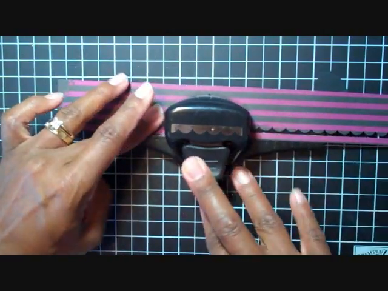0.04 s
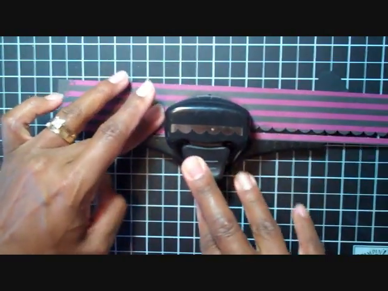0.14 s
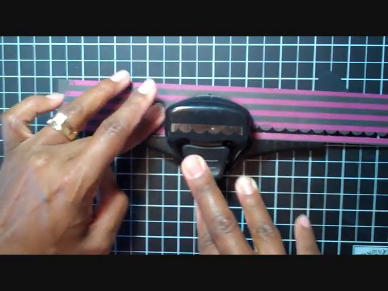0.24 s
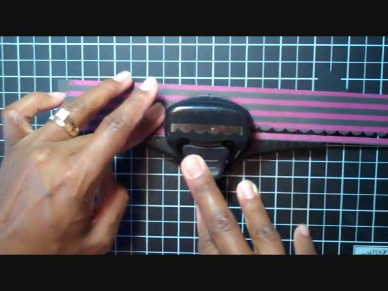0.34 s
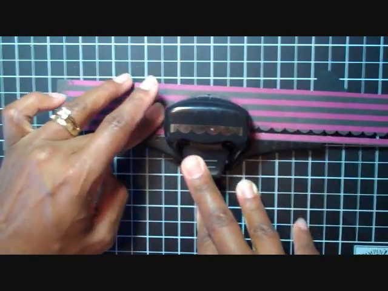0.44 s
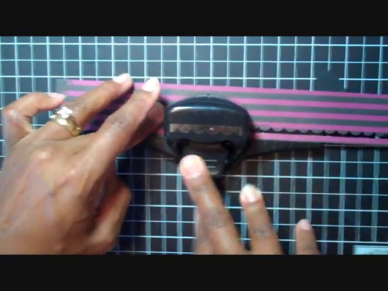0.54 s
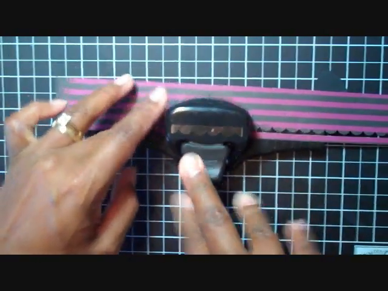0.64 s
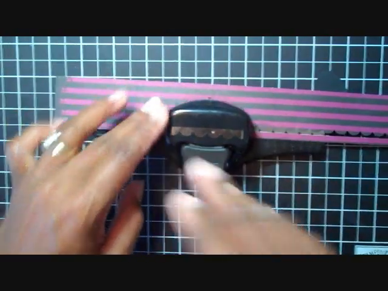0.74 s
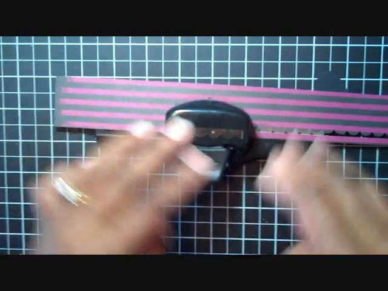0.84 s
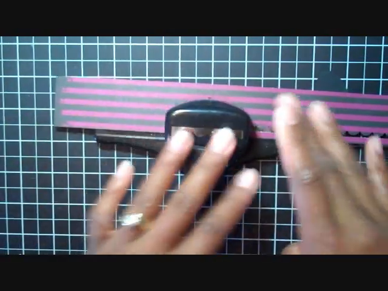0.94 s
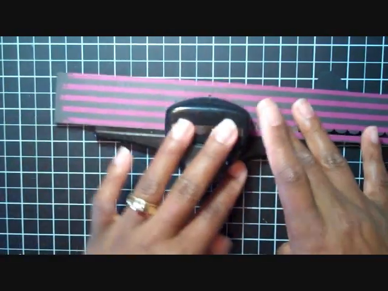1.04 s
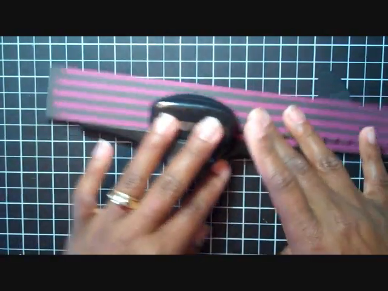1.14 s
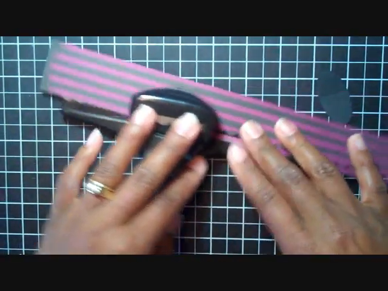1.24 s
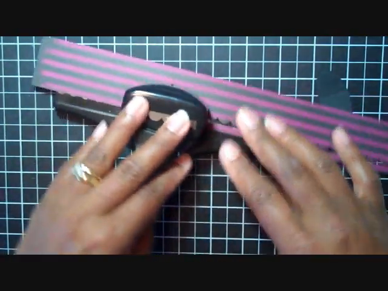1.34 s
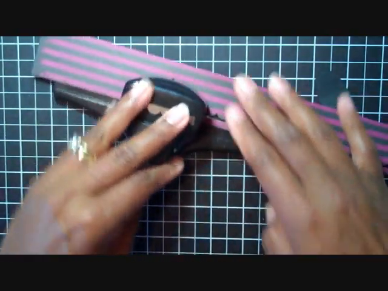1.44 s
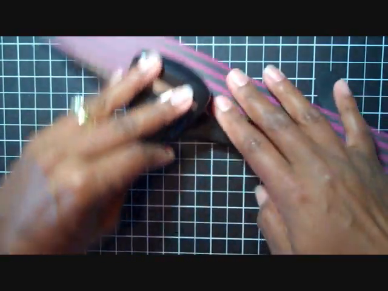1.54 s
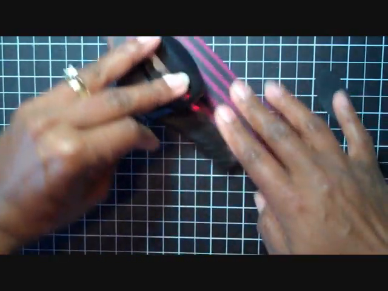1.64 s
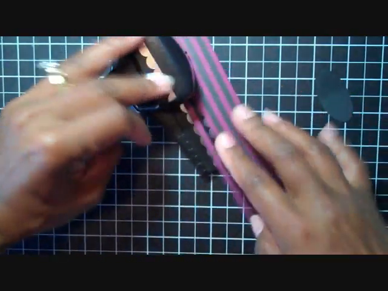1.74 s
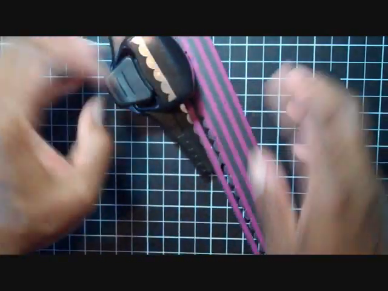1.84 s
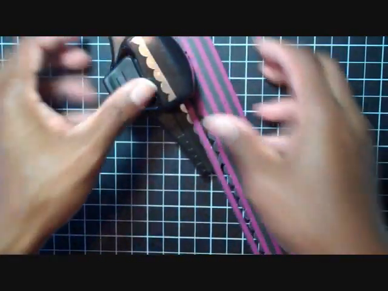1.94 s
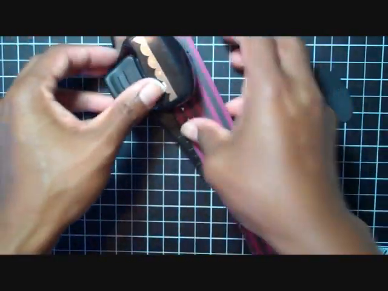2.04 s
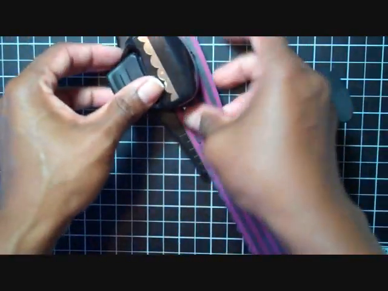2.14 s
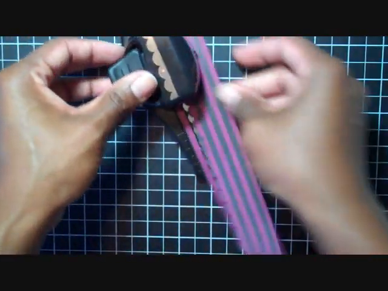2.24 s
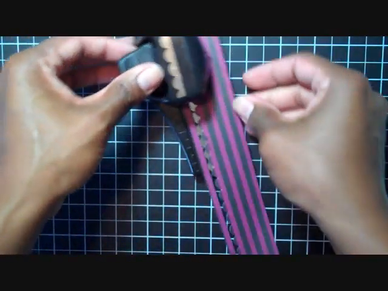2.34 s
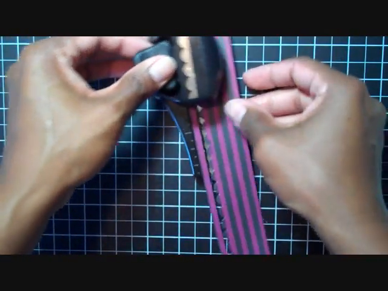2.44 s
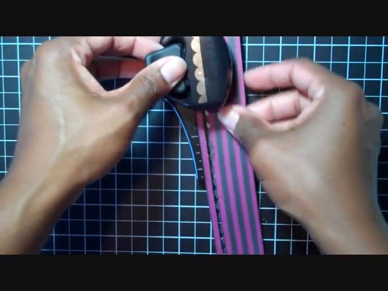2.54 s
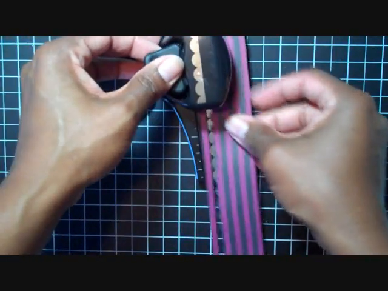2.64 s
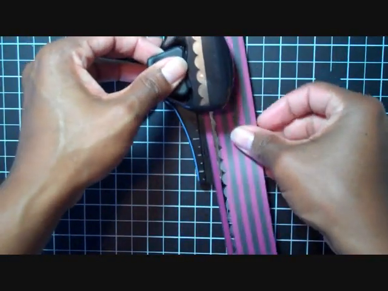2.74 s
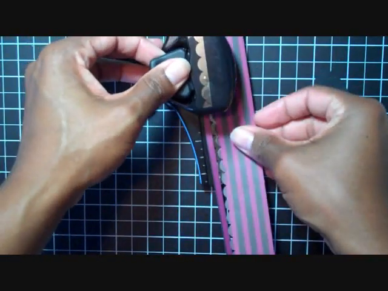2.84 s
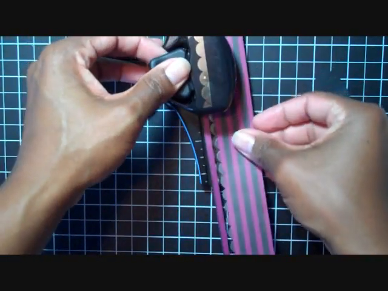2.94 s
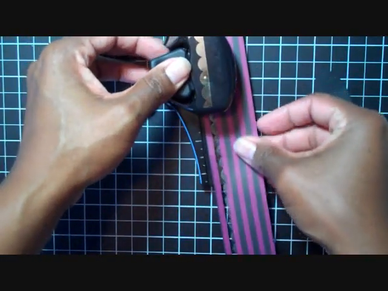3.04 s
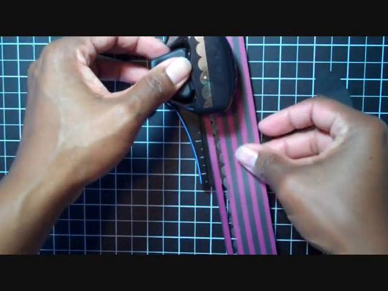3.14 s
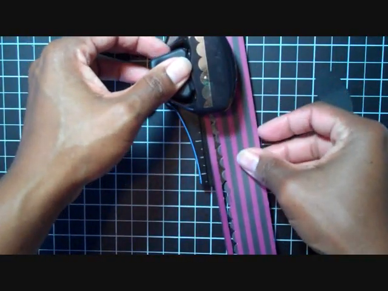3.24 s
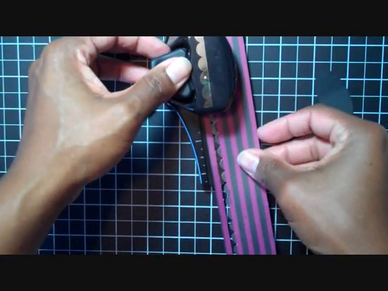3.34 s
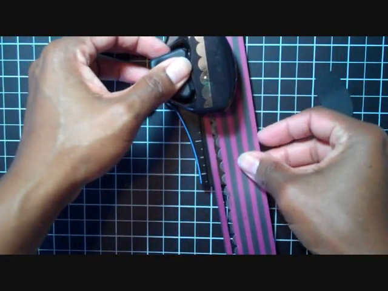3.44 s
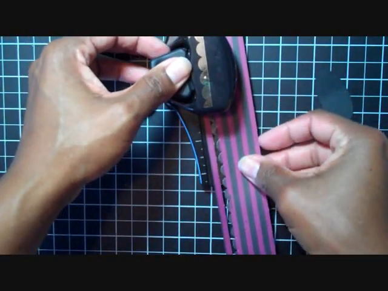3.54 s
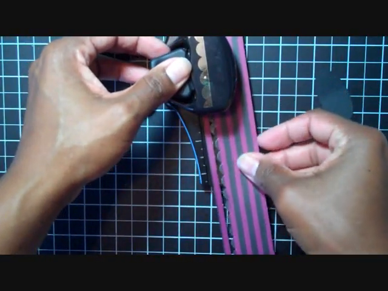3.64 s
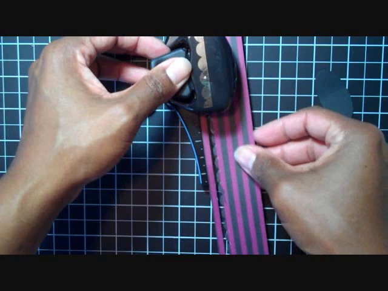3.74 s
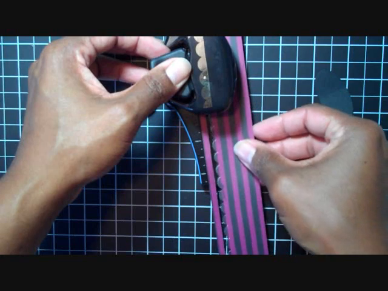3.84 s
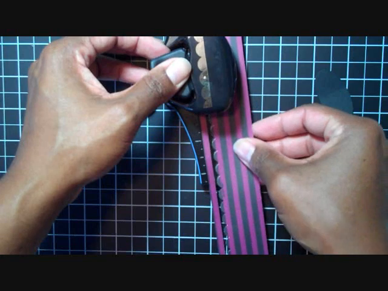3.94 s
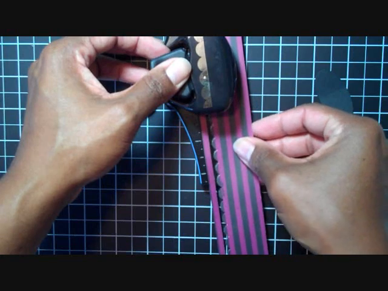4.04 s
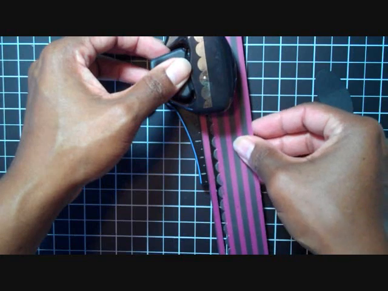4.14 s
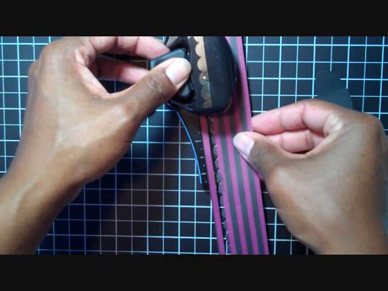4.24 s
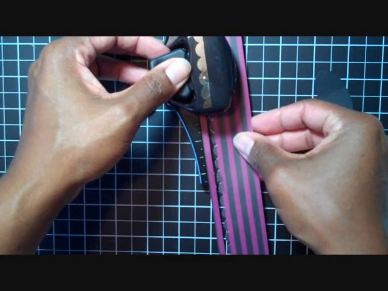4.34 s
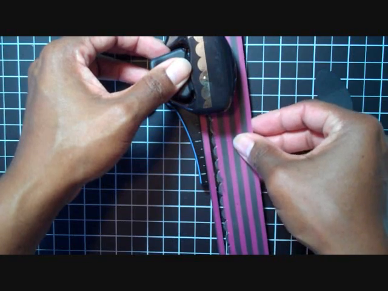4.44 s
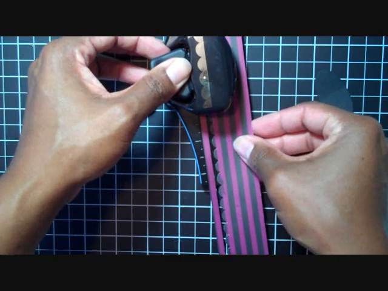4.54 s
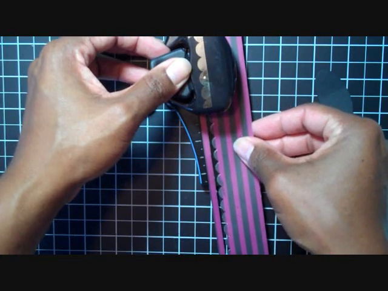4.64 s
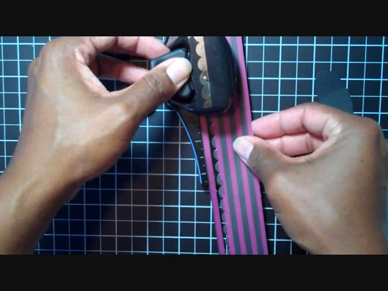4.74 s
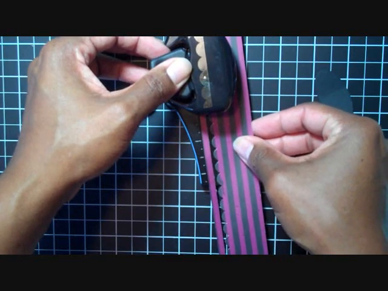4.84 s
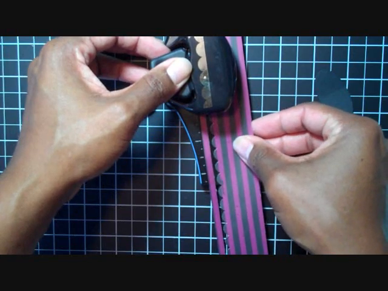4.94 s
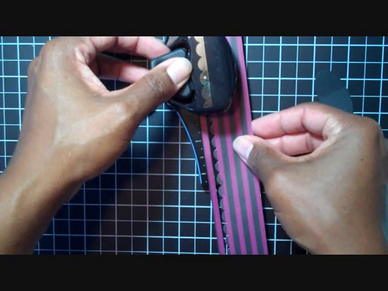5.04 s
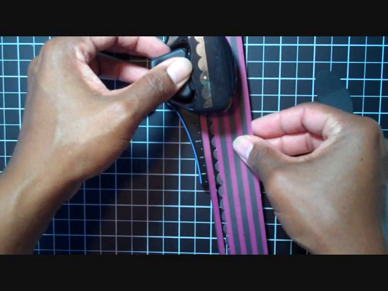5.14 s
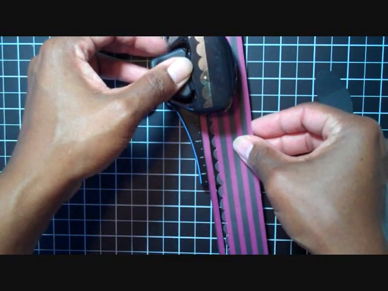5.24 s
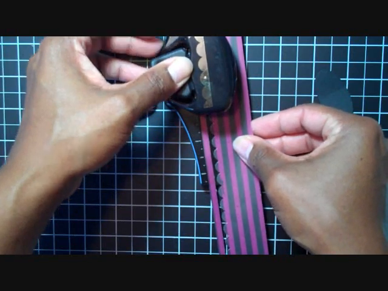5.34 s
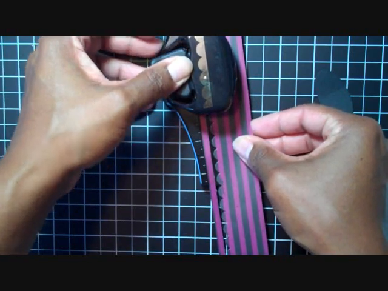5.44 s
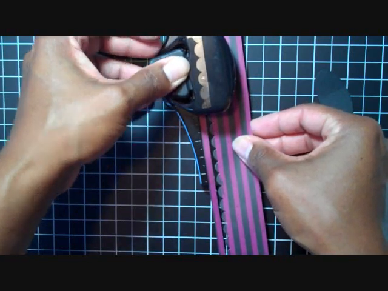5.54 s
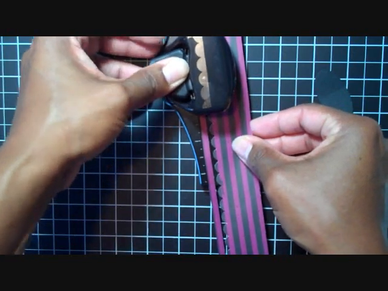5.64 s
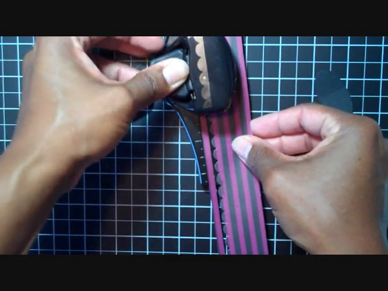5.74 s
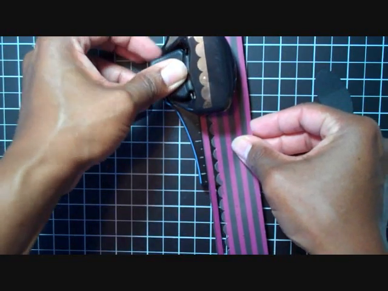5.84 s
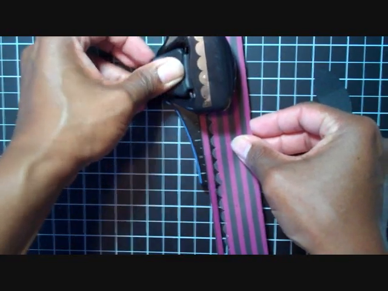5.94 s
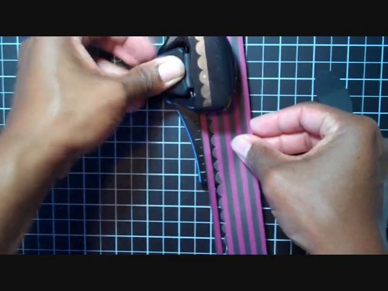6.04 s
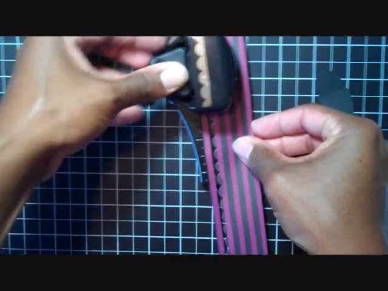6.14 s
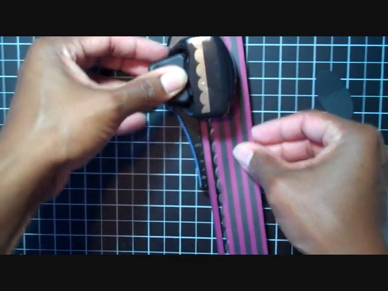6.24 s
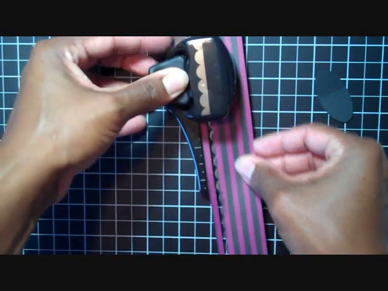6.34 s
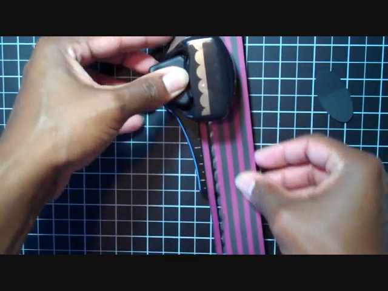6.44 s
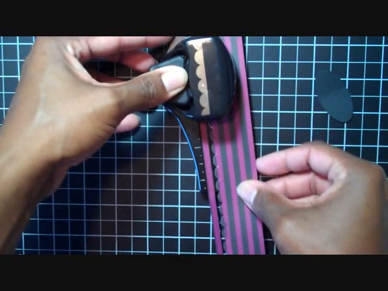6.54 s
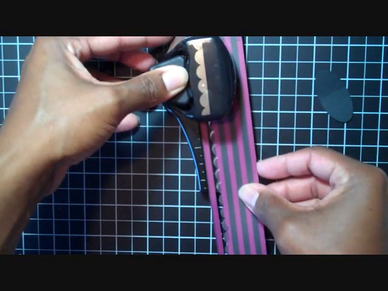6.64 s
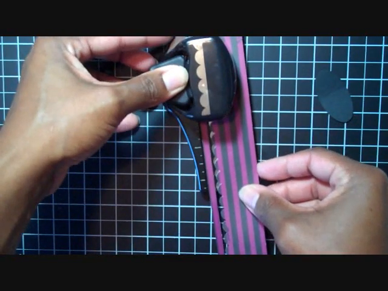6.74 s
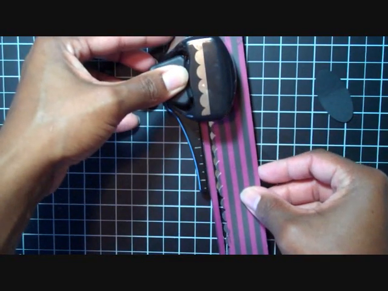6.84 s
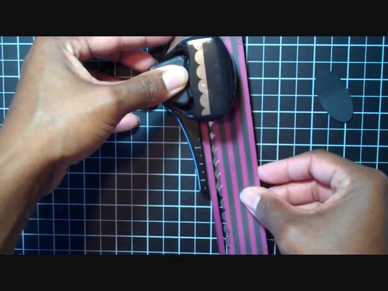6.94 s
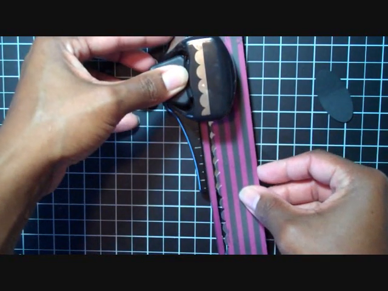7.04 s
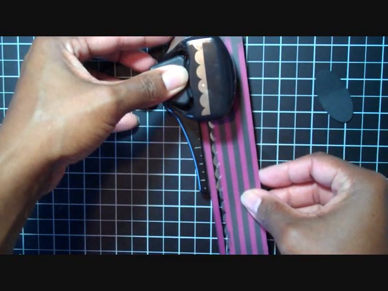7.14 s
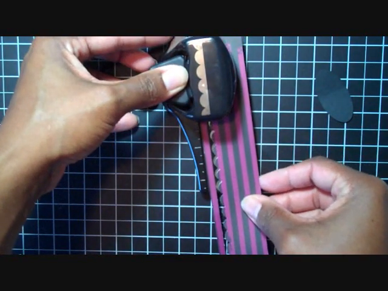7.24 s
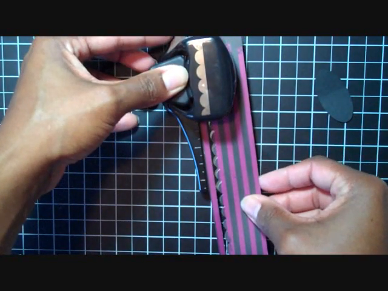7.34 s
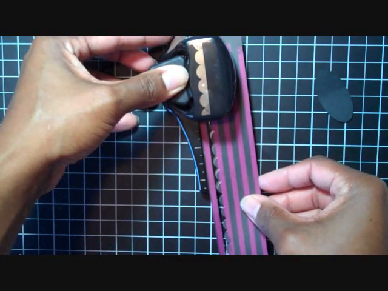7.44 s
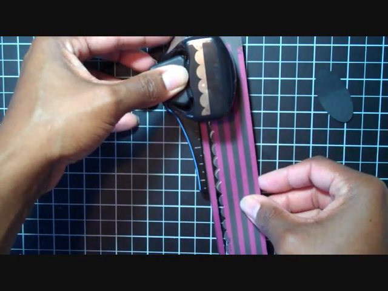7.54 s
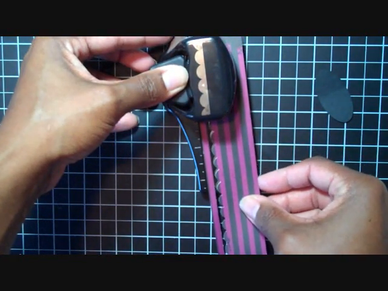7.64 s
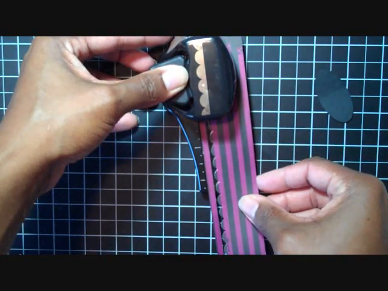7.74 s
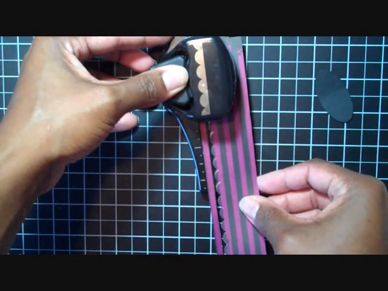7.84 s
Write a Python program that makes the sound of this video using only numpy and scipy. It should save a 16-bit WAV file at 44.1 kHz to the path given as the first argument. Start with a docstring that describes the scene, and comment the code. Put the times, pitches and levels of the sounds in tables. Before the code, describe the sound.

Close on a craft table in a small room, a plastic paper punch clicks and snaps hard at the start. Paper and punch then slide and rattle busily over the mat for a couple of seconds, thin out to faint rustles, and a second firm double-stage snap comes near six seconds, followed by ticks and light rubbing. A faint fan hums behind; close stereo pickup, slightly dull.

```python
"""A fan hums far off in a small room, where an earlier snap still dies away as we begin. At the table a plastic
border punch clicks at lever, hinge and paper, from bursts of tiny contacts; its die bites through a paper strip
at about 0.5 and 6 s, each bite a dense run of cracks, and at 2.1 s the paper crumples in a sparser crackle.
Between bites punch and paper slide over the cutting mat as filtered grains, and soft bumps shake the table. Two
resonant microphone ports colour left and right."""
import sys
import numpy as np
from scipy import signal
from scipy.io import wavfile

SR = 44100
rng = np.random.default_rng(int(sys.argv[2]) if len(sys.argv) > 2 else 0)


def waveform_to_disk(signal):
    """Save audio, clipped to [-1, 1], as 16-bit WAV at the path in sys.argv[1]."""
    frames = np.transpose(np.atleast_2d(signal))
    scaled = np.clip(frames, -1, 1) * 32767
    samples = np.round(scaled).astype(np.int16)
    wavfile.write(sys.argv[1], SR, samples)


N = 347508
T = np.arange(N) / SR   # seconds

# Room air, relative spectrum. Each row: frequency in Hz, density in dB per Hz.
AIR_SPECTRUM = [(18, -58), (30, -8), (217, -5.5), (256, -14.5), (423, -3), (591, -18), (865, -10.5),
                (1240, -17.5), (1530, -17.5), (1950, -19.5), (2140, -19), (4380, -27), (8950, -60),
                (11600, -74), (19700, -120)]
# Likeness of left and right microphone in the room sound. Each row: frequency in Hz, correlation from 0 to 1.
LIKENESS = [(60, 0.44), (210, 0.91), (710, 0.84), (2460, 0.3), (8500, 0.01)]
# Distant fan, humming in the ducts. Each row: frequency in Hz, width in Hz, level in dB.
FAN_HUMS = [(417, 20, -61), (880, 80, -70), (1550, 130, -70)]
# Small room's reverberation. Each row: frequency in Hz, time to fall 60 dB in s, relative level in dB.
ROOM_DECAY = [(200, 0.15, -18), (600, 0.27, -25.5), (1610, 0.13, -22), (3670, 0.37, -31),
              (7000, 0.14, -25.5), (12000, 0.11, -20)]
# Clicks of lever, hinge and paper. Each row: start in seconds, peaks of crack, housing ring and slap in dB,
# slap pitch in Hz, contact time in ms.
CLICKS = [(0.1128, -40, -33.5, -29, 2520, 8.2), (0.1272, 3.5, -13.5, -5.5, 2730, 1.93),
          (0.3054, -10, -20.5, -12.5, 4300, 4.1), (0.452, -34, -61.5, -41, 2330, 13),
          (0.7, -40, -25.5, -28.5, 1880, 3.9), (0.714, -13, -39.5, -28.5, 4250, 2.2),
          (0.7537, -6, -15, -3.5, 1790, 2.73), (0.764, -27, -25, -33.5, 1890, 2.9),
          (0.7821, -28, -31.5, -19.5, 1660, 1.4), (0.7876, -4, -13.5, -7.5, 1690, 3),
          (1.168, -13.5, -42, -27.5, 3930, 4.2), (1.2089, -25, -34.5, -9.5, 3670, 3.6),
          (1.4206, -29, -58, -39, 3950, 7.8), (1.635, -18, -46, -13, 3850, 6.3),
          (1.6666, -42, -58, -20.5, 1910, 9.5), (1.8386, -22, -22.5, -7.5, 1820, 5.7),
          (1.8557, -21.5, -21, -11, 1860, 1.61), (2.045, -41, -31.5, -33, 1510, 7.8),
          (2.2546, -39, -29.5, -24, 2590, 4.7), (2.2658, -10.5, -47, -17, 4200, 3.6),
          (2.3166, -10, -51.5, -7.5, 3940, 3.5), (2.343, -22, -53, -30.5, 1980, 3.1),
          (2.4225, -20, -52, -26, 2960, 6.9), (2.4408, -9.5, -58, -18, 4300, 4.3),
          (2.5226, -18, -47, -18, 2540, 5.1), (2.63, -26, -50, -25, 4220, 6.9),
          (2.773, -27, -68, -31, 1700, 6.7), (2.8207, -42, -65, -28, 1950, 4.2),
          (2.9833, -40, -65, -38, 3990, 12.5), (3.8176, -37, -63, -45, 3710, 6.2),
          (4.2954, -58, -44, -24.5, 1880, 0.66), (4.3587, -62, -44, -37, 1870, 4.7),
          (4.404, -60, -55, -43, 3670, 4.5), (4.447, -71, -58, -34.5, 3790, 3.5),
          (5.6733, -46, -44.5, -48, 1540, 1.9), (5.7795, -49.5, -34, -36.5, 1550, 2.5),
          (5.7888, -33, -49.5, -30.5, 1910, 10.5), (5.8217, -29, -49, -43.5, 4100, 2.9),
          (5.8346, -13.5, -16.5, -11.5, 1860, 2), (5.8952, -24.5, -39, -29, 1770, 3.4),
          (5.9105, -16.5, -26, -21.5, 1850, 7.8), (5.9352, -3, -18, -15, 1670, 3.96),
          (5.961, -17, -37, -29.5, 4300, 16), (5.9788, -15.5, -28.5, -29, 4300, 4.7),
          (6.1567, -37.5, -24.5, -28, 1650, 0.83), (6.17, -20, -32.5, -21, 4300, 3.7),
          (6.193, -23.5, -31, -32, 1580, 3.9), (6.247, -11, -29, -25, 1640, 10),
          (6.256, -11.5, -43, -4.5, 4300, 2.1), (6.3128, -8.5, -42, -14.5, 2630, 2.73),
          (6.4052, -30, -49, -37.5, 1560, 6.2), (7.1002, -41, -61, -44, 4040, 5),
          (7.358, -24.5, -49, -18, 3370, 2.4)]
# Table top resonances. Each row: frequency in Hz, width in Hz, relative level in dB.
TABLE_MODES = [(132.8, 230, -9), (238, 17, 5), (298, 54, 7.5), (417, 260, 0.5)]
# Plastic punch housing. Each row: frequency in Hz, relative level in dB, time to fall 60 dB in s.
HOUSING_MODES = [(653, -11, 0.017), (944, -5.5, 0.044), (1080, -4.5, 0.027), (1166, 0.5, 0.01),
                 (1420, 0, 0.0093)]
# Strokes of paper and punch over the mat. Each row: start in seconds, length in seconds,
# paper hiss at first and at last in dB, housing scrape in dB.
STROKES = [(0.305, 0.0027, -39, -42, -41.5), (0.72, 0.039, -44, -39, -42), (1.117, 0.042, -55.5, -56, -57),
           (1.203, .24, -40.5, -41.5, -48), (1.496, 0.03, -41, -49, -46.5), (1.589, 0.076, -36, -37, -39),
           (1.694, 0.13, -35, -27.5, -44.5), (1.86, 0.023, -51, -39, -40.5), (2.001, .01, -60, -54, -56.5),
           (2.07, 0.11, -54, -41, -50.5), (2.224, 0.203, -44.5, -41.5, -48),
           (2.455, 0.2, -39.5, -44.5, -47.5), (2.702, 0.019, -49.5, -48, -55.5),
           (2.754, 0.078, -40.5, -50.5, -56), (2.854, 0.059, -60, -49.5, -52.5),
           (2.985, 0.044, -56, -52.5, -56.5), (3.05, 0.087, -60, -57, -58), (3.122, 0.12, -49, -59, -61.5),
           (3.235, .12, -63, -61, -72.5), (3.542, .12, -56.5, -66, -80.5), (3.735, 0.21, -57.5, -60.5, -72),
           (4.27, 0.15, -57.5, -75.5, -70), (4.451, 0.24, -83, -65, -82), (5.855, 0.13, -41, -47, -42),
           (6.174, 0.083, -41, -48.5, -50.5), (6.33, 0.12, -55.5, -45.5, -58),
           (6.48, 0.26, -44, -63.5, -59.5), (6.876, 0.086, -57.5, -64.5, -65),
           (7.223, 0.093, -55, -56, -64)]
# Plastic feet scraping on the mat. Each row: frequency in Hz, width in Hz, relative level in dB.
SCRAPE_MODES = [(265.4, 170, -8.5), (950, 130, 1), (1510, 430, -0.5), (1900, 240, 3), (2630, 440, -4.5)]
# The die going through the sheet, and at 2.1 s the paper crumpling. Each row: start in seconds, length in
# seconds, cracks per second, # first and last level in dB, slap pitch in Hz, then thud, housing and slap
# against the crack in dB.
CRUNCHES = [(0.464, 0.017, 16000, -20, -22, 1870, -25.5, -6.5, -3.5),
            (0.4737, 0.013, 10100, -9.5, 2.5, 1820, -22.5, -9, 0),
            (2.109, 0.046, 1900, -16, -15.5, 3800, -27, -25, -7.5),
            (5.841, 0.012, 13000, -21, -27, 1920, -6, -7, 0.5),
            (6.0076, 0.013, 13200, -13, 0.5, 1870, -18.5, -9, -2)]
# The tilted punch bumping the table softly. Each row: start in seconds, peak in dB.
BUMPS = [(2.141, -40), (2.265, -40.5), (2.463, -44), (2.632, -39.5), (5.846, -29), (6.012, -21),
         (6.159, -37)]
# Microphone inlets, left then right. Each row: resonance in Hz, width in Hz, shading above this Hz.
PORTS = [(7234, 1200, 5000), (6220, 690, 2800)]

AIR_DB = -54.5
ECHO_DB, ROOM_GAP_S = -14.5, 0.0064   # the echo fades in around this gap
EARLIER_SNAP_S, EARLIER_SNAP_DB = 0.04, 15.5   # the snap came this long before the start
PORT_LIFT_DB = -0.5   # what the inlets add to a crack, taken off beforehand
THUD_UNDER_HOUSING_DB = 13.5   # what shakes the housing also thuds into the table
RISE_DB_PER_S, FALL_DB_PER_S = 699.5, 501.5   # a stroke gathers and loses speed
AIRY_DB, AIRY_PER_DB = -6, -0.16   # top of the paper hiss at -42.5 dB; louder strokes have relatively less
CRACKLES_PER_S, CRACKLE_DB = 140, -8.5   # creases snap while the paper moves
CRUNCH_END_DB_PER_S = 5000
BUMP_MS = 1.75   # time to the peak of the push
HISS_DB, BASS_CUT_HZ, CUTOFF_HZ = -62.5, 96, 14650


def amp(db):
    """dB to gain."""
    return 10 ** (np.asarray(db) / 20)


def rms_one(x):
    """Scales to unit rms."""
    return x / np.sqrt(np.mean(x ** 2) + 1e-20)


def at_hz(points, hz, column=1):
    """Reads a table on a log-frequency axis."""
    points = np.array(points)
    return np.interp(np.log(hz), np.log(points[:, 0]), points[:, column])


def band(x, low_hz, high_hz):
    """Band-pass."""
    sos = signal.butter(2, [low_hz, high_hz], "band", fs=SR, output="sos")
    return signal.sosfilt(sos, x + 1e-18)


def two_poles(hz, width):
    """Feedback of one resonance; the width sets how fast it dies."""
    r = np.exp(-np.pi * width / SR)
    return [1, -2 * r * np.cos(2 * np.pi * hz / SR), r * r]


def resonate(x, peaks):
    """Parallel resonances of (Hz, width, dB), signs alternating."""
    out = 0
    for k, (hz, width, db) in enumerate(peaks):
        a = two_poles(hz, width)
        b = [(1 - a[2]) / 2, 0, (a[2] - 1) / 2]
        out = out + (-1) ** k * amp(db) * signal.lfilter(b, a, x + 1e-18)
    return out


def drift(rate_hz):
    """Slow random wander of rms 1, from noise through a double low-pass."""
    r = np.exp(-2 * np.pi * rate_hz / SR)
    wander = signal.lfilter([1], [1, -2 * r, r * r], rng.standard_normal(N + SR))
    return rms_one(wander[SR:])   # the first second only settles the filter


def grains(per_s, spread_db):
    """Random tiny impacts of uneven size; rms 1."""
    sizes = amp(spread_db * np.minimum(rng.exponential(1, N), 4))
    signs = rng.choice([-1, 1], N)
    struck = rng.random(N) < per_s / SR
    return rms_one(sizes * signs * struck)


def spread_stereo(mid, side, hz):
    """Mixes two independent noises so left and right are as alike as the table says."""
    alike = at_hz(LIKENESS, hz)
    return np.sqrt(1 + alike) * mid + np.sqrt(1 - alike) * side * [[1], [-1]]


def bodies(force, slap_hz):
    """How air, table top, housing and the struck part itself answer a contact force; each peaks at 1."""
    modes = []
    for hz, db, t60 in HOUSING_MODES:
        width = np.log(1000) / np.pi / t60
        modes.append((hz, width, db + 20 * np.log10(t60)))
    # neighbouring bands meet in opposite phase, so their signs alternate
    crack = amp(-4.5) * band(force, 11800, 15500) - band(force, 5500, 10000)
    thud = resonate(force, TABLE_MODES)
    housing = -resonate(force, modes)
    slap = resonate(force, [(slap_hz, 0.14 * slap_hz, 0), (1.3 * slap_hz, 0.2 * slap_hz, -5)])
    slap = slap + amp(-7.0) * band(force, 1500, 4000)
    answers = np.array([crack, thud, housing, slap])
    return answers / np.abs(answers).max(axis=1, keepdims=True)


def add(out, s, levels_db, slap_hz, force):
    """Lays the four answers to one contact (crack, thud, housing, slap) into the track."""
    i = round(s * SR)
    gains = amp(np.array(levels_db) - [PORT_LIFT_DB, 0, 0, 0])
    sound = gains @ bodies(force, slap_hz)
    out[i:i + len(sound)] += sound


def room_tone():
    """Half-octave bands of air noise, more alike in the bass, with the far fan's wavering hum bands."""
    air, edges = 0, 25 * 2 ** np.arange(0, 9.1, 0.5)
    white = rng.standard_normal((2, 2, N))
    for k, (low, high) in enumerate(zip(edges, edges[1:])):
        mid, side = band(white[k % 2], low, high)   # neighbouring bands use separate noise
        hz = np.sqrt(low * high)
        air = air + amp(at_hz(AIR_SPECTRUM, hz)) * spread_stereo(mid, side, hz)
    noise = rng.standard_normal(N)
    fan = sum(amp(db) * rms_one(resonate(noise, [(hz, width, 0)])) for hz, width, db in FAN_HUMS)
    return amp(AIR_DB) * rms_one(air) + fan * amp(1.1 * drift(1.5))


def room_echo():
    """Dense reflections after the first wall, dying octave by octave, less alike left and right in the treble."""
    t, out = np.arange(SR // 2) / SR, 0
    for hz in 100 * 2.0 ** np.arange(8):
        mid, side = band(rng.standard_normal((2, len(t))), hz / np.sqrt(2), hz * np.sqrt(2))
        decay = amp(at_hz(ROOM_DECAY, hz, column=2) - 60 * t / at_hz(ROOM_DECAY, hz))
        out = out + decay * spread_stereo(mid, side, hz)
    onset = np.clip(t / ROOM_GAP_S - 0.5, 0, 1) ** 2
    return amp(ECHO_DB) * out * onset


def clicks():
    """Each click is a burst of micro-contacts that dies on the scale of its contact time."""
    out, size = np.zeros(N), 4096
    chatter = rng.standard_normal((len(CLICKS), size))
    for (s, crack_db, housing_db, slap_db, slap_hz, ms), noise in zip(CLICKS, chatter):
        t = np.arange(size) / SR / (ms / 1000)   # in contact times
        burst = noise * np.exp(-1.3 * t) * (1 - np.exp(-4 * t))
        burst[np.argmax(np.abs(burst))] *= 2.5   # the hardest touch stands out
        thud_db = housing_db - THUD_UNDER_HOUSING_DB
        add(out, s, [crack_db, thud_db, housing_db, slap_db], slap_hz, burst)
    return out


def sliding():
    """Paper and plastic feet rub over the mat's grain: dense uneven grains, bright for paper, hollow for plastic."""
    hiss_db, scrape_db = np.full((2, N), -120.0)
    for s, length, first_db, last_db, feet_db in STROKES:
        end = s + length
        edges_db = -RISE_DB_PER_S * np.maximum(s - T, 0) - FALL_DB_PER_S * np.maximum(T - end, 0)
        hiss_db = np.maximum(hiss_db, edges_db + np.interp(T, [s, end], [first_db, last_db]))
        scrape_db = np.maximum(scrape_db, edges_db + feet_db)
    crackle = grains(CRACKLES_PER_S, spread_db=4.5)
    rub = grains(6000, spread_db=1.5) + amp(CRACKLE_DB) * crackle
    airy = amp(AIRY_DB + AIRY_PER_DB * (hiss_db + 42.5))
    paper = rms_one(band(rub, 2800, 10000)) - airy * rms_one(band(rub, 12300, 16500))
    paper *= amp(1.3 * drift(60))   # the hiss flutters
    feet = rms_one(resonate(grains(5000, spread_db=5.0), SCRAPE_MODES))
    feet *= amp(1.5 * drift(25))   # the scrape wavers more slowly
    return amp(hiss_db) * paper + amp(scrape_db) * feet


def crunches():
    """Fibres tear or crease in a run of uneven cracks that dies within a moment."""
    out, t = np.zeros(N), T[:8192]
    for s, length, per_s, first_db, last_db, slap_hz, *bodies_db in CRUNCHES:
        run_db = np.interp(t, [0, length], [first_db, last_db])
        swell = amp(run_db - CRUNCH_END_DB_PER_S * np.maximum(t - length, 0))
        levels_db = max(first_db, last_db) + np.array([0, *bodies_db])
        cracks = grains(per_s, spread_db=1.5)[:len(t)]
        add(out, s, levels_db, slap_hz, swell * cracks)
    return out


def bumps():
    """A soft push rings the table top only."""
    out, t = np.zeros(N), T[:4096]
    push = t * np.exp(-1000 * t / BUMP_MS)
    thud = resonate(push, TABLE_MODES)
    thud = thud / np.abs(thud).max()
    for s, db in BUMPS:
        i = round(s * SR)
        out[i:i + len(t)] += amp(db) * thud
    return out


def scene():
    """Everything on the table, its echo, the earlier snap's tail and the room tone."""
    table = clicks() + sliding() + crunches() + bumps()
    echo = room_echo()
    reflected = signal.fftconvolve(table[None], echo, axes=1)[:, :N]
    out = room_tone() + table + reflected
    tail = echo[:, round(EARLIER_SNAP_S * SR):]
    out[:, :tail.shape[1]] += amp(EARLIER_SNAP_DB) * tail
    return out


def record(dry):
    """Each inlet is a resonant low-pass, shaded by the case; bass rolls off, circuits hiss, peaks clip, top is cut."""
    out = np.zeros_like(dry)
    for k, (hz, width, shade_hz) in enumerate(PORTS):
        a = two_poles(hz, width)
        port = signal.lfilter([sum(a)], a, dry[k])   # unit gain in the bass
        out[k] = signal.lfilter(*signal.butter(1, shade_hz, fs=SR), port)
    out = signal.lfilter(*signal.butter(1, BASS_CUT_HZ, "high", fs=SR), out)
    out += amp(HISS_DB) * rng.standard_normal(out.shape)
    out = np.clip(out, -0.95, 0.95)
    return signal.sosfilt(signal.cheby2(20, 65, CUTOFF_HZ, fs=SR, output="sos"), out)


dry = scene()
out = record(dry)
waveform_to_disk(out)
```